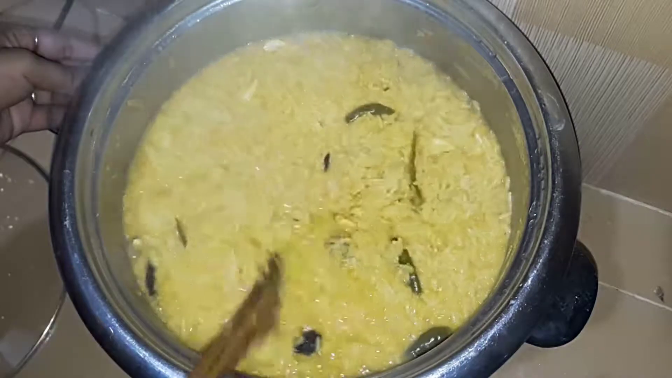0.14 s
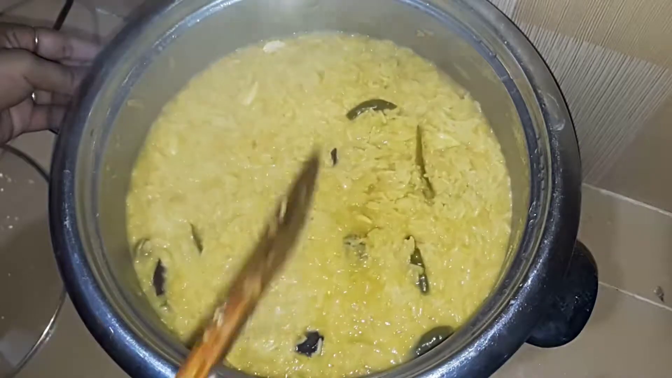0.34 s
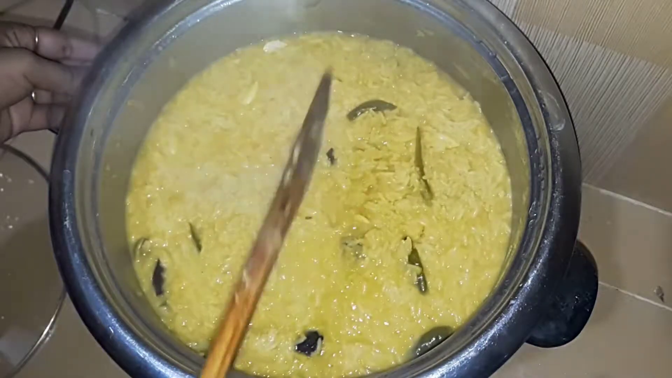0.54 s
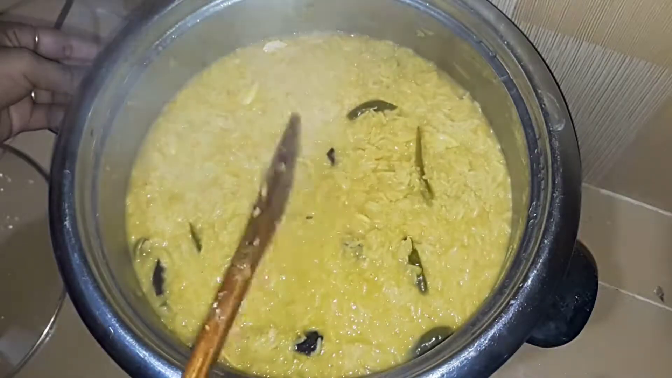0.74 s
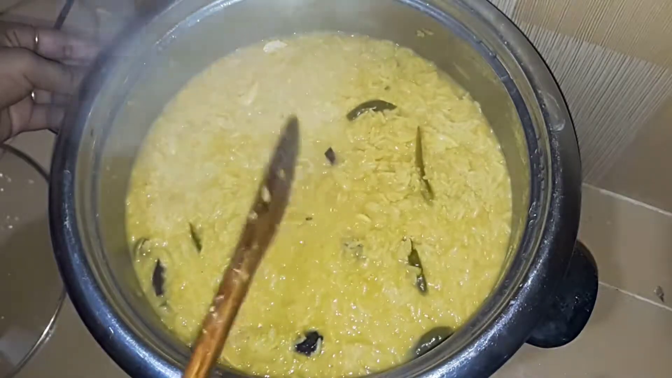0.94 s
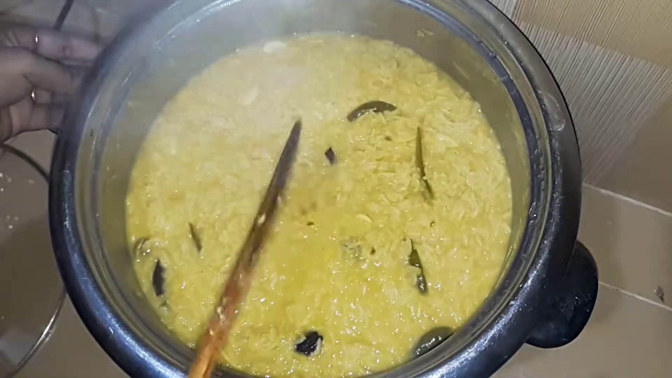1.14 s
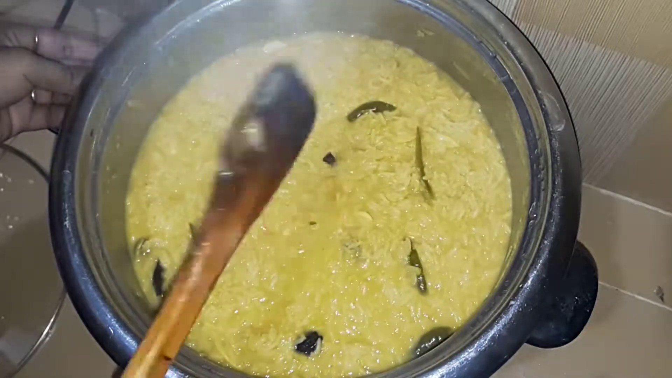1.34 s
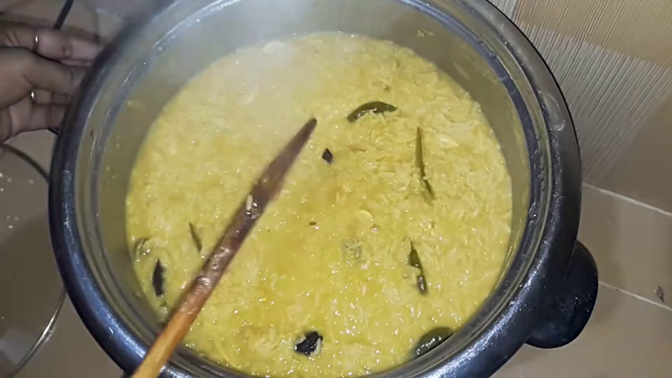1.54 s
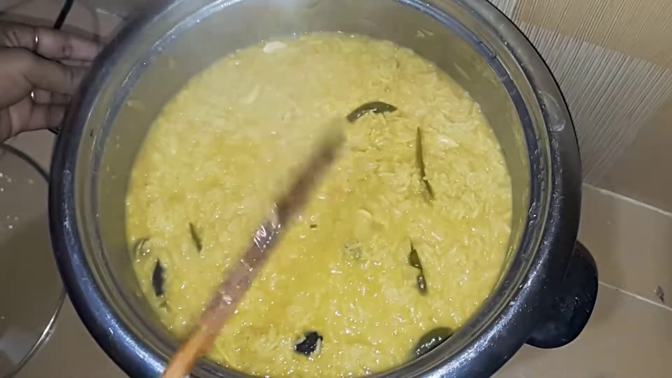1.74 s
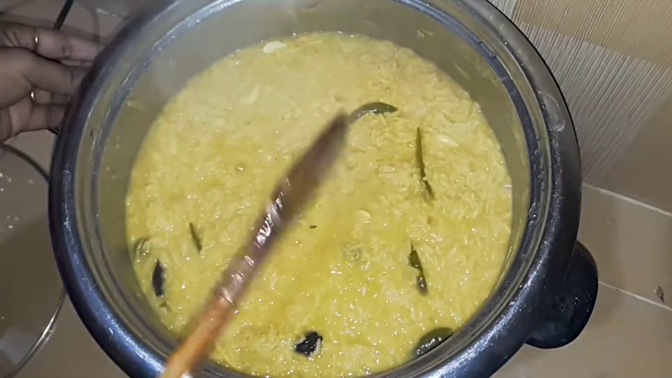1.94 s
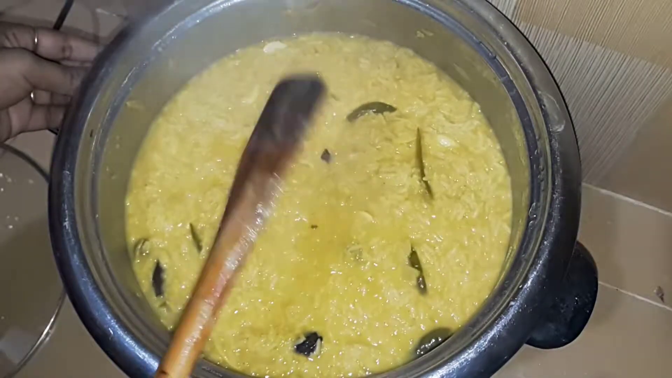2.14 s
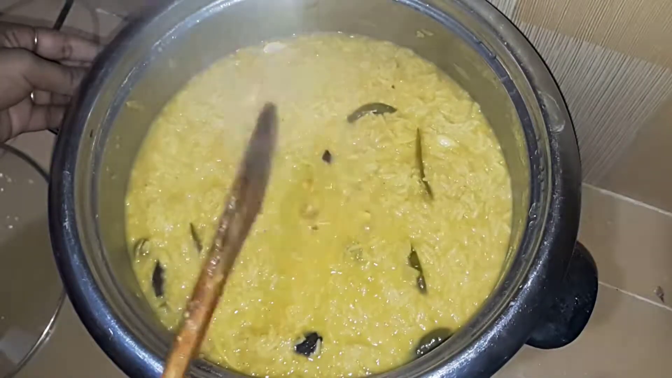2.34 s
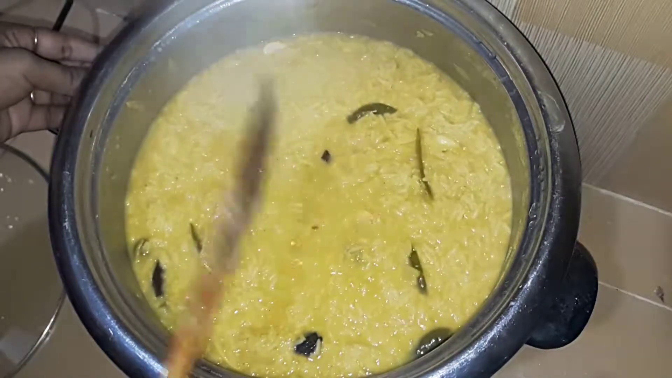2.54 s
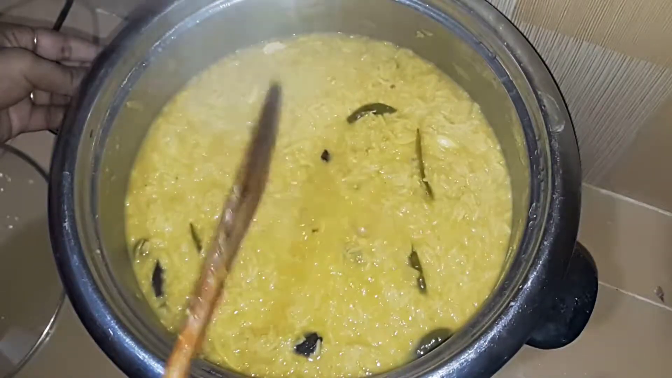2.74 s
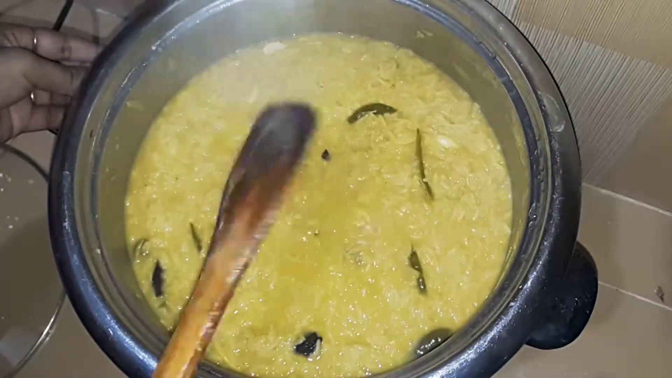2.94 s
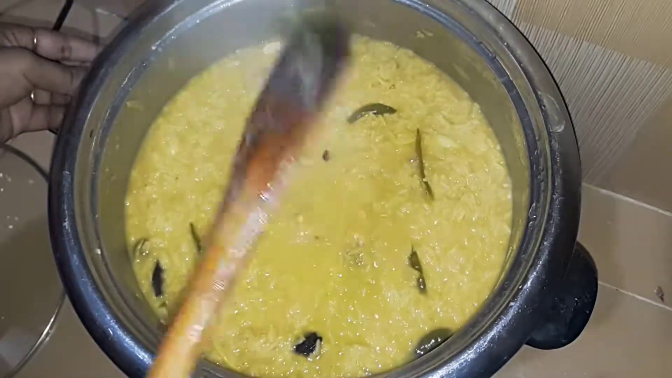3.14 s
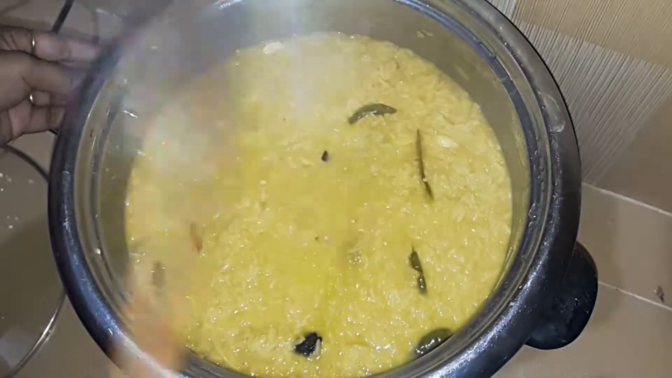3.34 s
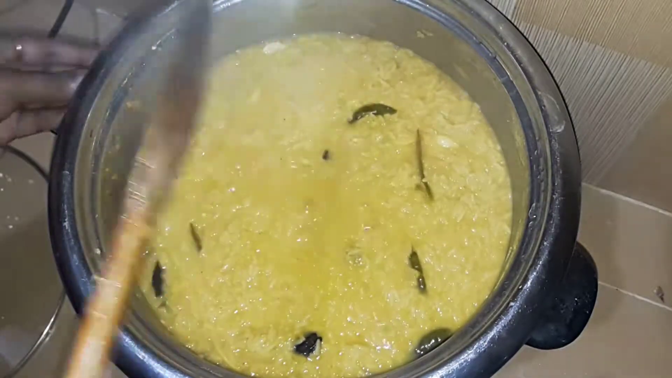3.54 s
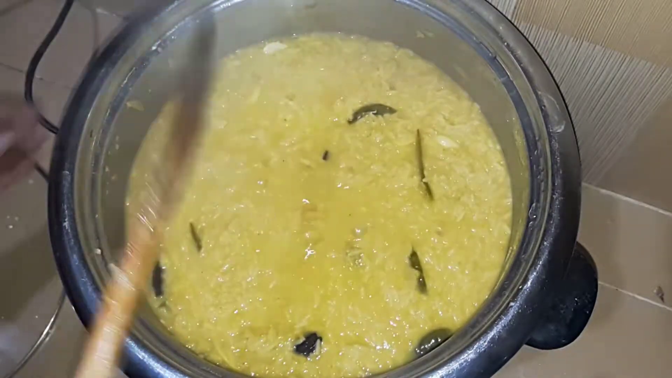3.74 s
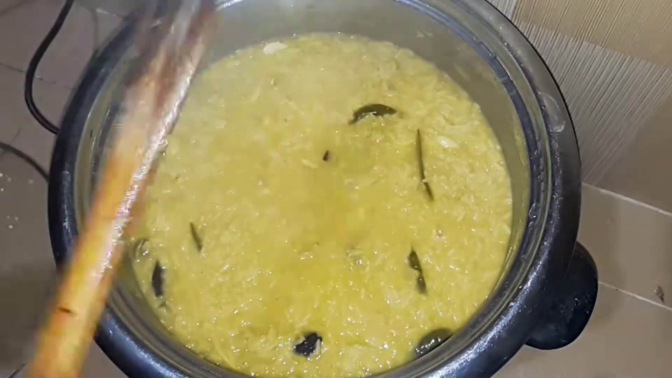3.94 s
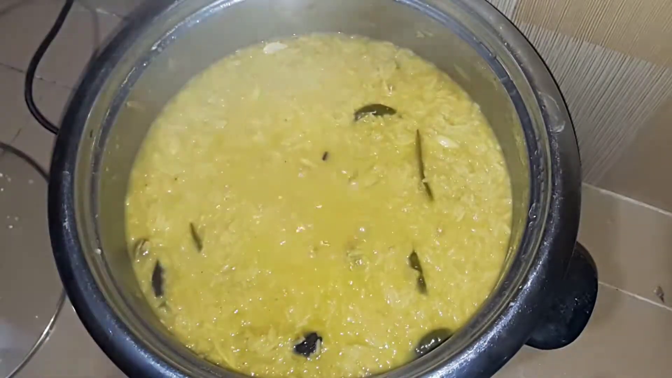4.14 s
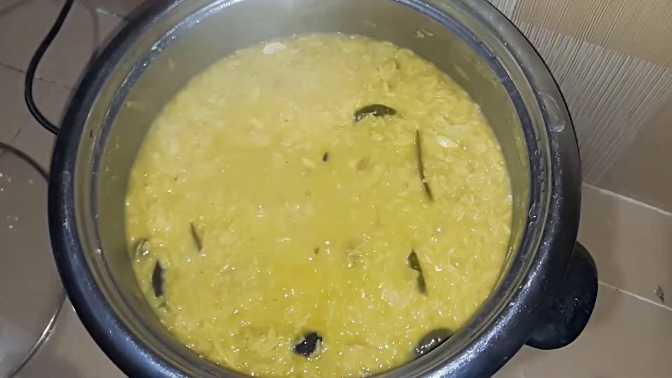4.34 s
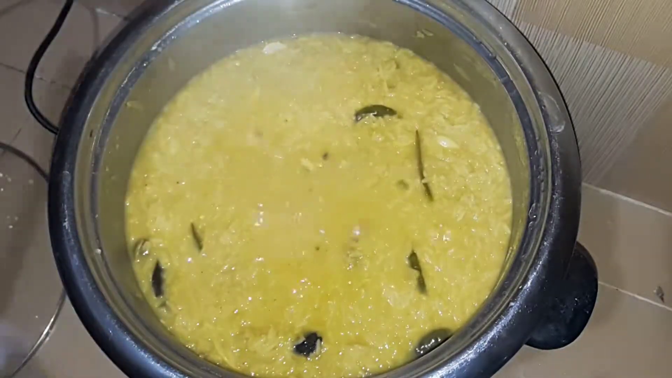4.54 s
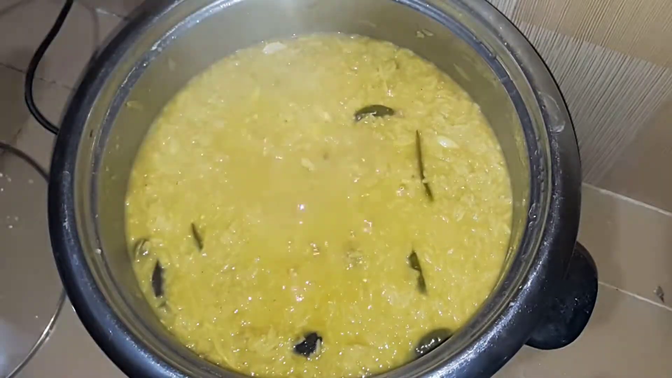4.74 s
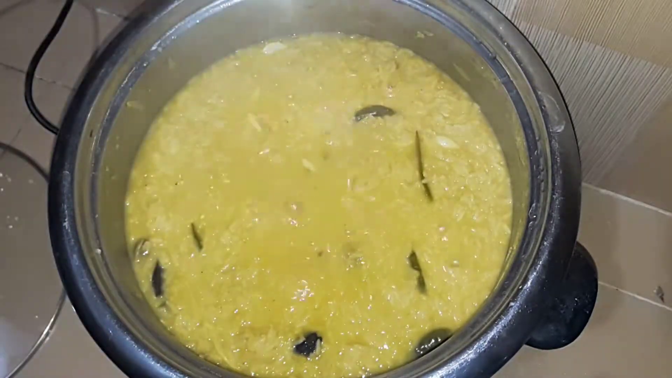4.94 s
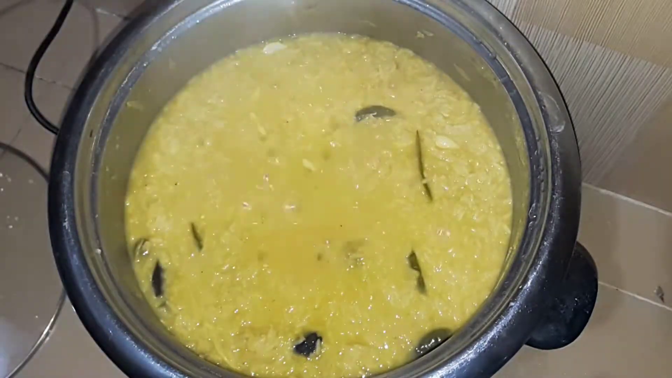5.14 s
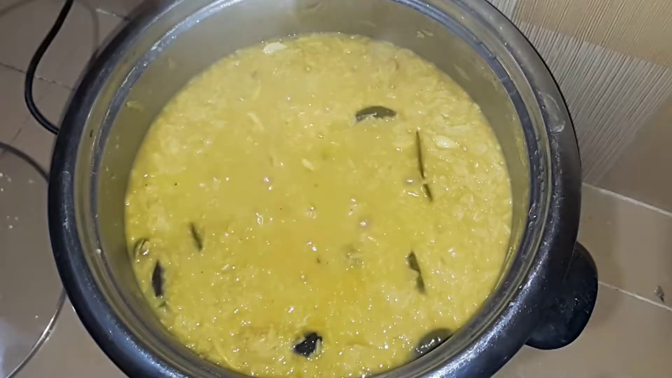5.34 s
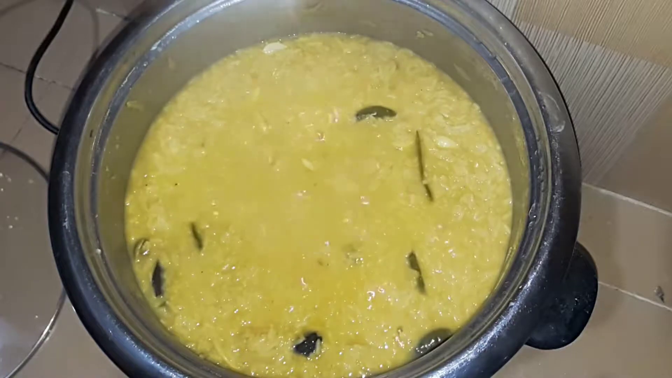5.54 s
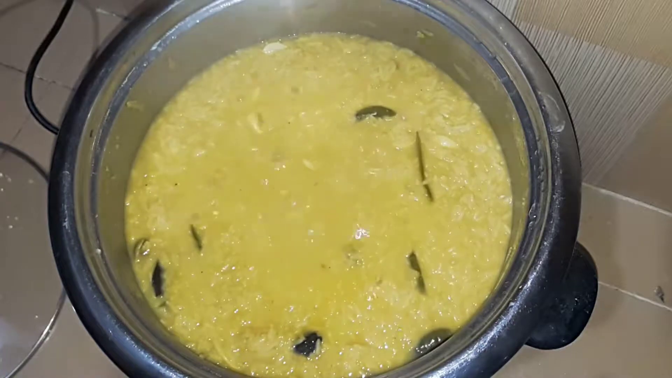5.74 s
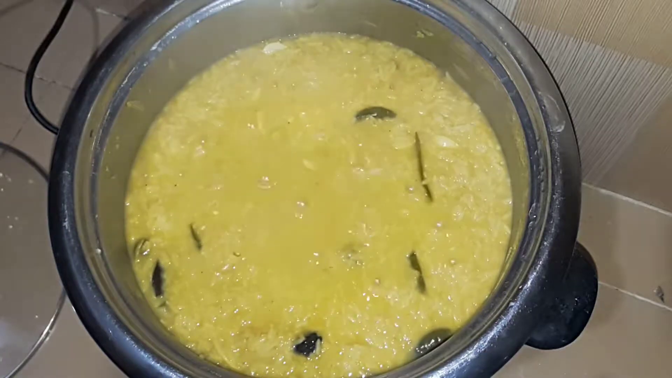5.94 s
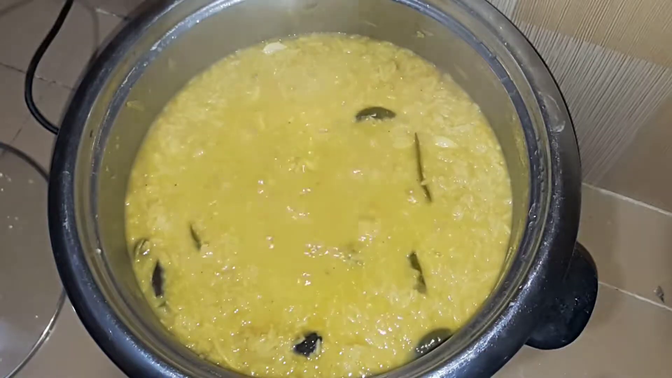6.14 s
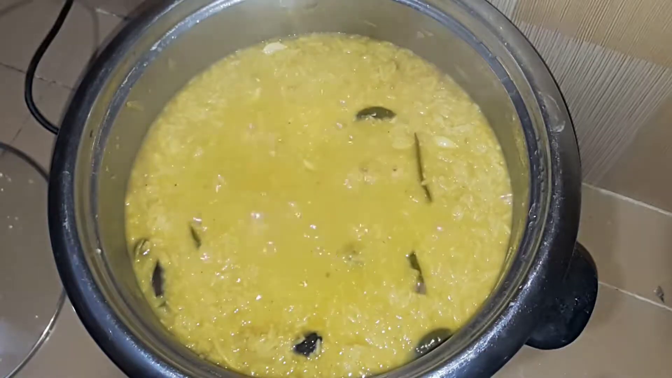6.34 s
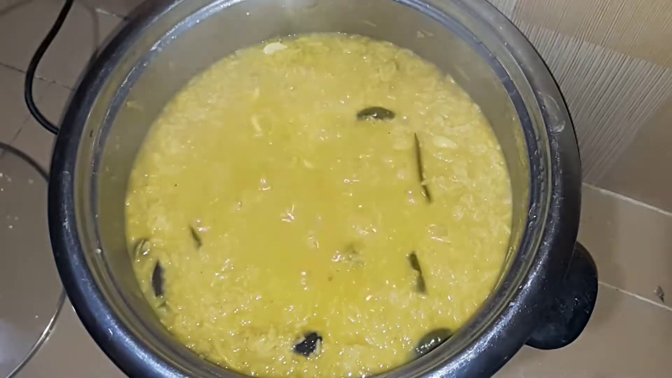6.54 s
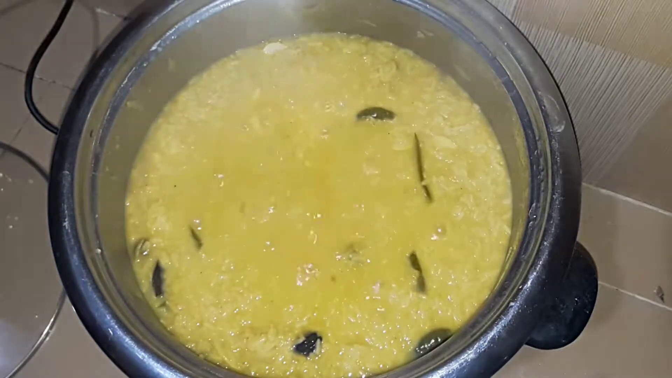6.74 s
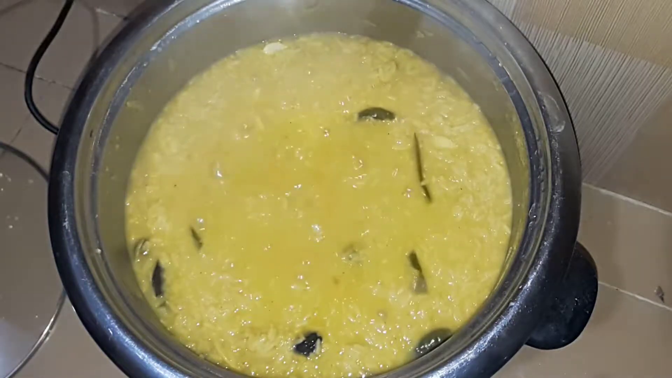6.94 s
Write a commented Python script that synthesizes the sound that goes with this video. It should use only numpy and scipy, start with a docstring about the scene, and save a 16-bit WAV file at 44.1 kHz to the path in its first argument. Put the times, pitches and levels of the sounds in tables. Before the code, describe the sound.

Thick food bubbles and spits steadily while wood raps loudly on a metal pot rim, followed later by one wooden clack off to the side.

```python
"""A wooden spoon knocks the rim of a metal cooker pot in three runs, close to a stereo microphone in a hard kitchen.
Each blow rings the modes of pot and spoon over a noisy imprint; later the spoon is laid down off to the right.
In the pot a thick rice dish simmers: bubbles plop and spit as short rising sines with cracks of torn skin,
over a rush and hiss of filtered noise. At the start the spoon leaves the dish with a slop, a spray of wet bursts."""
import sys
import numpy as np
from scipy import signal
from scipy.io import wavfile

SR = 44100
rng = np.random.default_rng(int(sys.argv[2]) if len(sys.argv) > 2 else 0)


def materialize(psi):
    """Save the field psi as 16-bit PCM at rate SR to the path in sys.argv[1].

    A 1-D psi becomes a single channel; in a 2-D psi each row is a channel.
    """
    bounded = np.clip(np.atleast_2d(psi).T, -1, 1)
    quanta = np.round(bounded * 32767).astype(np.int16)
    wavfile.write(sys.argv[1], SR, quanta)


def gain_from_db(level_db):
    """Convert decibel levels to linear amplitude factors (20 dB per decade)."""
    decades = np.asarray(level_db, float) / 20
    return 10 ** decades


N = 312650  # samples

# Reverberation of the kitchen. Each row: frequency in Hz, time to fall 60 dB in s.
KITCHEN_T60 = [(60, 1), (200, 0.56), (600, 0.41), (1500, 0.42), (4000, 0.52), (12000, 0.24)]
# Relative strength of the kitchen's echoes. Each row: frequency in Hz, level in dB.
KITCHEN_COLOUR = [(60, 2.5), (200, -7.5), (600, -2), (1500, -6.5), (4000, -5.5), (12000, 3)]
# Correlation of left and right in all noise. Each row: frequency in Hz, correlation (1 = same).
LEFT_RIGHT_LIKENESS = [(30, 0.42), (100, 0.96), (300, 0.87), (700, 0.2), (1500, 0.033), (4000, 0.037),
                       (12000, 0.1)]

# The boil sags after stirring and recovers. Each row: time in seconds, vigour in dB.
VIGOUR = [(0, -0.5), (.6, -2.5), (2.4, -2), (3.3, 0.5), (4.15, -1), (5.2, 0), (7.09, 0.5)]
# Colour of the low simmering rush. Each row: frequency in Hz, relative density in dB per Hz.
RUSH_SPECTRUM = [(12, -40), (20, 1), (43, -13), (86, -15.5), (108, 14), (141, -18), (200, 4), (343, -5.5),
                 (387, -8.5), (425, -1.5), (500, -10), (650, -40), (1100, -120)]
# Colour of the simmering hiss, ahead of the pot's air. Each row: frequency in Hz, relative density in dB per Hz.
HISS_SPECTRUM = [(240, -33), (400, -6), (562, -0.5), (636, -11), (801, -3), (1140, -1.5), (1440, -7.5),
                 (2590, -7), (7060, -16.5), (10500, -24), (13300, -21), (14100, -35), (16000, -75)]
# Place of the simmer. Each row: frequency in Hz, left minus right in dB.
SIMMER_BALANCE = [(60, -2.5), (180, -2.5), (550, -2.5), (1650, -2.0), (4970, -5.0), (15000, 0.0)]
# Resonances of the air in the pot. Each row: frequency in Hz, width in Hz, relative level in dB.
POT_AIR = [(646, 14, 3), (906, 30, -1), (1140, 36, -3), (1783, 55, 0), (2622, 15, 0), (2980, 37, -35),
           (3500, 190, -6)]
RUSH_DB, HISS_DB, SMALL_DB, FIZZ_DB = -45, -45.5, -49.5, -54.5  # rms at 0 dB vigour
RUSH_FOLLOWS, HISS_FOLLOWS, SMALL_FOLLOWS = 1.17, 0.46, 2.7  # dB per dB of vigour
RIGHT_LAG = 2  # samples by which the dish reaches the right side later

# Loud bubbles bursting. Each row: start in seconds, peak in dB ahead of the pot's air,
# pitch at the start in Hz, left minus right in dB.
PLOPS = [(0.596, -29, 1830, -0.5), (0.758, -33, 1220, -0.5), (1.387, -38, 670, -3), (1.525, -36.5, 620, -2),
         (2.393, -23, 1140, 0), (2.592, -24.5, 1080, -9), (3.053, -27.5, 1140, -7), (3.231, -29.5, 684, -3),
         (3.288, -34, 1200, -3), (3.409, -40, 930, -4), (3.422, -30.5, 1200, -5), (3.482, -29, 1030, -5),
         (3.536, -30.5, 900, -1.5), (3.584, -28, 890, -1.5), (3.655, -37, 625, -2),
         (3.811, -33, 1120, -1.5), (3.824, -32.5, 640, -1), (3.898, -34, 2010, -2), (4.266, -32, 840, -2),
         (4.362, -35, 1160, -3), (4.391, -25, 2100, -4), (4.461, -28.5, 1050, 0), (4.484, -26, 1140, -10),
         (4.739, -31.5, 646, -2), (4.884, -28, 1090, -3.5), (5.093, -36, 1140, -2), (5.108, -32, 1200, -2),
         (5.242, -30, 960, -1.5), (5.297, -29, 1110, -1), (5.337, -37, 910, 1), (5.369, -32, 960, -3),
         (5.666, -30.5, 906, -7), (5.72, -32.5, 860, -0.5), (5.735, -27.5, 1110, 1.5),
         (5.846, -31, 1000, -2), (6.175, -34, 1170, -1), (6.196, -34, 1130, 1), (6.223, -39, 850, -5),
         (6.268, -31, 660, -2.5), (6.342, -35, 1810, 0), (6.404, -33, 1140, -1.5), (6.511, -33, 1790, -1.5),
         (6.599, -33.5, 1240, -2), (6.639, -32, 980, -2), (6.747, -28, 1090, -1.5)]
# Droplets spitting. Each row: start in seconds, peak in dB, pitch at the start in Hz, left minus right in dB.
SPITS = [(0.785, -30, 5750, -5), (3.1193, -36, 2610, -8), (3.3051, -26, 5770, -17.5),
         (3.8064, -37, 3140, -10), (3.9828, -34.5, 2470, -6.0), (4.3638, -34, 2640, -4.5),
         (4.3932, -26, 3670, -6), (4.4608, -35, 2530, -4.0), (4.8878, -31, 4480, -4.0),
         (5.0484, -37.5, 2660, -5.0), (5.243, -23.5, 5480, -6), (5.3703, -26, 3740, -2),
         (5.4124, -41, 2880, -5.5), (5.645, -28.5, 4070, -11), (6.4288, -36, 3600, -4.5),
         (6.7042, -32.5, 2620, -4.0), (6.8377, -31, 2590, -3.0)]
# Crack of the skin in a plop. Each row: frequency in Hz, level against the burst's peak in dB, 60 dB decay in s.
PLOP_CRACK = [(2400, -9, 0.0021), (5000, -12, .003)]
# Crack of the skin in a spit. Each row: frequency in Hz, level against the burst's peak in dB, 60 dB decay in s.
SPIT_CRACK = [(2880, -5, 0.0046), (7100, -4, 0.0047), (12700, -23, .0023)]
PLOP_CYCLES, SPIT_CYCLES = 12.2, 15.4  # cycles at the starting pitch per 60 dB of decay

# Spoon leaving the dish, with a low suck under the spray.
SLOP_S, SLOP_DB, SLOP_ATTACK_S, SLOP_T60_S = 0.079, -27.5, 0.013, 0.12
SLOP_PUSH_DB, SLOP_PUSH_HZ = -8, 193  # dB against the spray

# Clearer modes of the counter. Each row: frequency in Hz, level in dB, 60 dB decay in s.
COUNTER_MODES = [(93, -32, .4), (186, -36, .3), (867, -31, .23), (1147, -35, .35), (1846, -32, .22),
                 (2514, -32, .2), (2681, -36, .3), (635, -30, .33), (678, -28, .3), (1265, -33, .4),
                 (1330, -23, .45)]
# Close-packed modes of spoon and counter. Each row: frequency in Hz, relative density in dB per Hz.
CLACK_SPECTRUM = [(180, -39), (300, -18), (480, -11), (592, -3.5), (680, -4), (1060, -5.5), (1340, 7),
                  (1470, -5), (1800, -0.5), (2770, -1.5), (3040, -8.5), (12000, -68), (15600, -80),
                  (22000, -120)]
LAID_DOWN_S, LAID_DOWN_DB, CLACK_T60_S = 5.867, -6.5, 0.2

# Spoon on the rim; the main and upper rim levels depend on where the blow lands. Each row: start in seconds,
# blow strength in dB, main rim mode in dB, upper rim modes in dB.
KNOCKS = [(0.899, -5, -8.5, -6), (1.087, -4, -9.5, -9), (1.609, -3.5, -1, -11.5), (1.84, -1, -1, -13),
          (2.06, -2.5, -4, -11), (2.325, -25, -15, -18), (2.414, -3, -5, -5.5), (2.65, -2, -3, -10),
          (2.869, -3.5, -6.5, -11)]
# Boom of the filled pot's body and stand. Each row: frequency in Hz, relative level in dB, 60 dB decay in s.
POT_BODY = [(98.2, -13, 0.42), (116.1, -22, 0.92), (186.7, -10, 0.75), (227.2, 2, 0.15), (266, -36, 0.33),
            (271, -33, 0.57), (334, -13, 0.14)]
# Clear modes of pot wall and rim. Each row: frequency in Hz, relative level in dB, 60 dB decay in s.
POT_RIM = [(603, -19, .25), (774, -13, .22), (810, -17, .3), (852, -6.5, .24), (911, -10, .25),
           (1014, -9, .17), (1158, -11, .15), (1453, -20, .2), (1620, -22, .2), (1809, -24, .25),
           (2129, -17, .3), (2308, 2, .21), (2520, -13, .15), (2734, -10, .36), (3105, -12, .13),
           (3256, -7.5, .32), (3460, -11.5, .25), (4554, -25, .45), (4641, -14.5, .3), (5196, -19, .25),
           (5638, -19, .25), (6250, -27, .22), (6910, -28, .22)]
# First contact, the spoon handle quickly damped by the hand. Each row: frequency in Hz, relative level in dB,
# 60 dB decay in s.
SPOON = [(1130, -3, .016), (1450, -7, .012), (3100, -8, .008)]
# Close-packed modes of pot, lining and housing, too many to tell apart. Each row: frequency in Hz,
# relative density in dB per Hz.
CLATTER_SPECTRUM = [(88, -19), (150, -27), (244, 0.5), (315, -20), (534, -36), (837, -10.5), (1690, -20.5),
                    (2360, -5.5), (2500, -15.5), (3350, -22.5), (4000, -34), (4670, -28), (4950, -32),
                    (7180, -30.5), (10000, -45.5), (13500, -45), (16000, -68)]
# Decay of those close-packed modes. Each row: frequency in Hz, 60 dB decay in s.
CLATTER_T60 = [(200, 0.35), (600, 0.52), (1100, 0.18), (1600, 0.044), (3000, 0.28), (6000, 0.17),
               (12000, 0.074)]
# Place of the knocked pot. Each row: frequency in Hz, left minus right in dB.
POT_BALANCE = [(60, -4.0), (130, -2.0), (290, -3.5), (640, -4.5), (1410, -0.5), (3100, 1.5), (6820, -4.5),
               (15000, 1.0)]
# Phase of the knocked pot's clear modes. Each row: frequency in Hz, lead of the left side in radians.
POT_PHASE = [(100, 0.28), (400, 0), (900, 0.85), (1200, 1.06), (2300, 1.3), (3400, 1.63), (6000, 1.4),
             (12000, 0)]
BODY_DB, RIM_DB, SPOON_DB, CLATTER_DB, DRY_RIM_DB = -7, -13, 3, 7, -7
HARDNESS_DB_PER_OCTAVE = 1.75  # tilt about 1 kHz
MAIN_RIM_HZ = 2308
# Rim modes above this sit in the dry rim; only the main one and those above twice this have levels set per blow.
BARE_METAL_HZ = 2000


def rms_one(x):
    """Scale to unit rms."""
    return x / np.sqrt(np.mean(x ** 2) + 1e-20)


def at_hz(points, hz):
    """Read a table on a log-frequency axis."""
    table = np.array(points)
    return np.interp(np.log(hz), np.log(table[:, 0]), table[:, 1])


def sides(pan_db):
    """Left and right gains for a level difference."""
    return gain_from_db(np.multiply.outer([.5, -.5], pan_db))


def drift(rate_hz):
    """Slow random wander along straight lines between knots of spread 1."""
    knots = rng.standard_normal(600)
    return np.interp(np.arange(N) / SR * rate_hz, np.arange(len(knots)), knots)


def train(seconds, gains):
    """Clicks of given size at given times."""
    clicks = np.zeros(N)
    np.add.at(clicks, (np.asarray(seconds) * SR).astype(int), gains)
    return clicks


def ring(clicks, hz, t60, phase=0.):
    """A decaying resonance: a unit click sets a sine of height 1 ringing from the given phase."""
    r = gain_from_db(-60 / (t60 * SR))
    w = 2 * np.pi * hz / SR
    start = [np.sin(phase), r * np.sin(w - phase)]
    return signal.lfilter(start, [1, -2 * r * np.cos(w), r * r], clicks + 1e-18)


def struck(clicks, hz, swell_cycles):
    """Wood meets a surface softly: the push reaches each mode as a short swell near its own pitch."""
    b, a = signal.iirpeak(hz, max(swell_cycles, .5), fs=SR)
    once = signal.lfilter(b, a, clicks + 1e-18)
    return signal.lfilter(b, a, once)


def bands(length):
    """Third-octave bands of stereo noise with the tabled likeness of the sides: yields centre Hz and noise."""
    edges = 22 * 2 ** (np.arange(30) / 3)
    white = rng.standard_normal((2, 2, length))
    for k, (low, high) in enumerate(zip(edges, edges[1:])):
        band = signal.butter(2, [low, high], "band", fs=SR, output="sos")
        mid, side = signal.sosfilt(band, white[k % 2])  # neighbouring bands use different noise
        hz = np.sqrt(low * high)
        alike = np.clip(at_hz(LEFT_RIGHT_LIKENESS, hz), -1, 1)
        yield hz, np.sqrt(1 + alike) * mid + np.sqrt(1 - alike) * side * [[1], [-1]]


def kitchen(x):
    """Hard walls: dense echoes that build up in about a millisecond and die band by band."""
    t = np.arange(SR) / SR
    echoes = np.zeros((2, SR))
    for hz, noise in bands(SR):
        echoes += noise * gain_from_db(at_hz(KITCHEN_COLOUR, hz) - 60 * t / at_hz(KITCHEN_T60, hz))
    echoes *= 1 - np.exp(-(t / 0.00067) ** 2)
    echoes /= np.sqrt(np.sum(echoes ** 2) / 2)
    return signal.fftconvolve(x[None], echoes, axes=1)[:, :N]


def pot_air(x):
    """The air in the pot adds its resonances to what sounds inside."""
    out = x.copy()
    for hz, width_hz, level_db in POT_AIR:
        out += gain_from_db(level_db + 5) * signal.lfilter(*signal.iirpeak(hz, hz / width_hz, fs=SR), x)
    return out


def simmer(rush_db, hiss_db):
    """Steam collapsing at the hot base: a low rush and a hiss, each band flickering a little."""
    rush, hiss = np.zeros((2, N)), np.zeros((2, N))
    together_db = 1.1 * drift(14)
    for hz, noise in bands(N):
        flicker = gain_from_db(together_db + 1.2 * drift(22))
        noise = noise * sides(at_hz(SIMMER_BALANCE, hz))[:, None] * flicker
        if hz < 450:
            rush += noise * gain_from_db(at_hz(RUSH_SPECTRUM, hz))
        else:
            hiss += noise * gain_from_db(at_hz(HISS_SPECTRUM, hz))
    return gain_from_db(rush_db) * rms_one(rush) + gain_from_db(hiss_db) * rms_one(pot_air(hiss))


def bursts(rows, cycles, rise, swell_cycles):
    """Each burst swells softly to its peak, rings out and climbs in pitch as the cavity shrinks."""
    t = np.arange(3000) / SR
    out = np.zeros((2, N + len(t)))
    for (s, peak_db, hz, pan_db), length in zip(rows, cycles + np.zeros(len(rows))):
        turns = hz * t
        swell = 1 - np.exp(-(turns / swell_cycles) ** 2)
        shape = swell * gain_from_db(-60 * turns / max(length, 2))
        tone = np.sin(2 * np.pi * turns * (1 + rise * turns))
        wave = gain_from_db(peak_db) * shape / shape.max() * tone
        start = int(s * SR)
        out[:, start:start + len(t)] += np.outer(sides(pan_db), wave)
    return out[:, :N]


def chance_bursts(count, start_s, end_s, low_hz, high_hz, spread_db, cycles, clump_s, rise, swell_cycles):
    """A crowd of unplanned bursts, few loud and many faint, rising in clumps of four."""
    when, size, pitch, place, damp, after = rng.random((count, 6)).T
    clump_start = start_s + np.repeat(when[::4], 4) * (end_s - start_s)
    when = np.minimum(clump_start + after * clump_s, end_s)
    peak_db = -spread_db * np.log(1.06 - size)
    hz = low_hz * (high_hz / low_hz) ** pitch
    rows = np.c_[when, peak_db, hz, 6 * place - 5.5]
    return bursts(rows, cycles * (.5 + damp), rise, swell_cycles)


def small_bubbles():
    """The steady crowd of small bubbles, coloured by the air in the pot."""
    small = chance_bursts(count=1400, start_s=0, end_s=7.08, low_hz=520, high_hz=2300, spread_db=4.5,
                          cycles=13, clump_s=.05, rise=.01, swell_cycles=1.5)
    return rms_one(pot_air(small))


def fizz():
    """A fine, high crowd of tiny bursts."""
    return rms_one(chance_bursts(count=1200, start_s=0, end_s=7.08, low_hz=1970, high_hz=8900, spread_db=2.5,
                                 cycles=32.0, clump_s=.01, rise=.005, swell_cycles=2.5))


def cracks(rows, modes):
    """The skin of a bursting bubble tears with a short broad crack."""
    s, peak_db, _, pan_db = np.transpose(rows)
    clicks = np.array([train(s, gains * gain_from_db(peak_db)) for gains in sides(pan_db)])
    return sum(gain_from_db(level_db) * ring(clicks, hz, t60) for hz, level_db, t60 in modes)


def plops():
    """Loud bubbles burst inside the pot, and its air resonates; their skins crack."""
    return pot_air(bursts(PLOPS, PLOP_CYCLES, rise=0.0092, swell_cycles=0.55)) + cracks(PLOPS, PLOP_CRACK)


def spits():
    """Droplets spit: high, short bursts with a crack."""
    return bursts(SPITS, SPIT_CYCLES, rise=.003, swell_cycles=2.5) + cracks(SPITS, SPIT_CRACK)


def slop():
    """The spoon sucks free of the dish: a dense spray of wet bursts over a low push, quick to rise, slower to die."""
    spray = chance_bursts(count=400, start_s=.04, end_s=.21, low_hz=1600, high_hz=3100, spread_db=2,
                          cycles=15, clump_s=.01, rise=0.0072, swell_cycles=0.12)
    spray /= spray[:, :SR // 5].std()
    push = gain_from_db(SLOP_PUSH_DB) * rms_one(ring(rng.standard_normal(N), SLOP_PUSH_HZ, 0.028))
    t = np.arange(N) / SR - SLOP_S
    attack = np.clip(t / SLOP_ATTACK_S, 0, 1)
    decay_db = -60 * np.maximum(t - SLOP_ATTACK_S, 0) / SLOP_T60_S
    return (spray + push) * attack * gain_from_db(SLOP_DB + decay_db)


def clatter(seconds, strength_db, tilt_db, spectrum, t60_table, balance, onset_s):
    """Very many close modes: one noisy imprint dying band by band, repeated by each blow a little unevenly."""
    t = np.arange(SR // 2) / SR
    out = np.zeros((2, N + SR))
    layers = []
    for hz, noise in bands(len(t)):
        fall = gain_from_db(at_hz(spectrum, hz) - 60 * t / at_hz(t60_table, hz))
        layers.append((hz, noise * np.outer(sides(at_hz(balance, hz)), fall)))
    onset = 1 - np.exp(-t / onset_s)
    for start, level_db in zip((seconds * SR).astype(int), strength_db):
        imprint = np.zeros((2, len(t)))
        for hz, layer in layers:
            imprint += layer * gain_from_db(tilt_db * np.log2(hz / 1000) + rng.normal(0, 2))
        out[:, start:start + len(t)] += gain_from_db(level_db) * imprint * onset
    return out[:, :N]


def laid_down():
    """Wood on a counter some way off: a dense clack that also rings the counter's clearer modes."""
    out = clatter(np.array([LAID_DOWN_S]), [LAID_DOWN_DB], 0, CLACK_SPECTRUM, [(1000, CLACK_T60_S)],
                  [(1000, -5.0)], onset_s=0.0012)
    for hz, level_db, t60 in COUNTER_MODES:
        push = struck(train([LAID_DOWN_S], gain_from_db(level_db)), hz, 5.4)
        out = out + ring(push, hz, t60)
    return out


def knocks():
    """Blows land near the same spot, so most mode strengths change only a little; hard wood favours high modes."""
    s, blow_db, main_db, upper_db = np.transpose(KNOCKS)
    out = clatter(s, blow_db + CLATTER_DB, HARDNESS_DB_PER_OCTAVE, CLATTER_SPECTRUM, CLATTER_T60,
                  POT_BALANCE, onset_s=0.000092)
    for modes, part_db, swell_cycles in ((POT_BODY, BODY_DB, 1.2), (POT_RIM, RIM_DB, 4.), (SPOON, SPOON_DB, 1.5)):
        for hz, level_db, t60 in modes:
            scatter_db = rng.normal(0, 2, len(s))
            hardness_db = HARDNESS_DB_PER_OCTAVE * np.log2(hz / 1000)
            strength_db = blow_db + part_db + level_db + hardness_db + scatter_db
            if modes is POT_RIM and hz > BARE_METAL_HZ:
                if hz == MAIN_RIM_HZ:
                    strength_db += main_db
                elif hz > 2 * BARE_METAL_HZ:
                    strength_db += upper_db
                else:
                    strength_db += DRY_RIM_DB
            push = struck(train(s, gain_from_db(strength_db)), hz, swell_cycles)
            left, right = sides(at_hz(POT_BALANCE, hz))
            out[0] += left * ring(push, hz, t60, at_hz(POT_PHASE, hz))
            out[1] += right * ring(push, hz, t60)
    return out


def scene():
    """Pot and dish close by, the counter off to the side; all but the simmering rush and hiss feed the room."""
    vigour_db = np.interp(np.arange(N) / SR, *np.transpose(VIGOUR))
    dish = gain_from_db(SMALL_DB + SMALL_FOLLOWS * vigour_db) * small_bubbles()
    dish = dish + gain_from_db(FIZZ_DB + HISS_FOLLOWS * vigour_db) * fizz()
    dish = dish + plops() + spits() + slop()
    aside = laid_down()
    pot = knocks()
    to_room = gain_from_db(-3.5) * pot + gain_from_db(-2.5) * dish + gain_from_db(-3) * aside
    room = kitchen(to_room.mean(axis=0))
    dish = dish + simmer(RUSH_DB + RUSH_FOLLOWS * vigour_db, HISS_DB + HISS_FOLLOWS * vigour_db)
    dish[1] = np.roll(dish[1], RIGHT_LAG)
    return pot + dish + aside + room


def low_pass(x):
    """Removes everything above the highest recorded frequency."""
    return signal.sosfilt(signal.butter(12, 16500, fs=SR, output="sos"), x)


def record(dry):
    """The deep bass is dropped at the microphone, a steep low-pass removes all above 16.4 kHz, peaks are rounded."""
    thin = signal.sosfilt(signal.butter(2, 60, "high", fs=SR, output="sos"), dry)
    thin = signal.sosfilt(signal.cheby2(12, 60, 16400, fs=SR, output="sos"), thin)
    rounded = 1.15 * np.tanh(thin / 1.15)
    return low_pass(rounded)


dry = scene()
out = record(dry)
materialize(out)
```